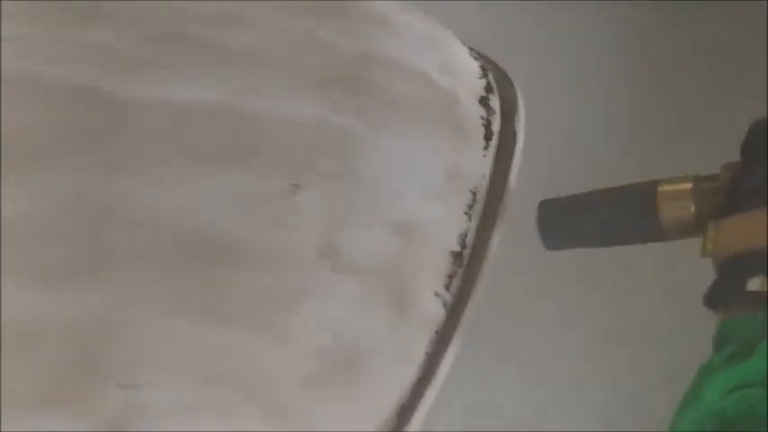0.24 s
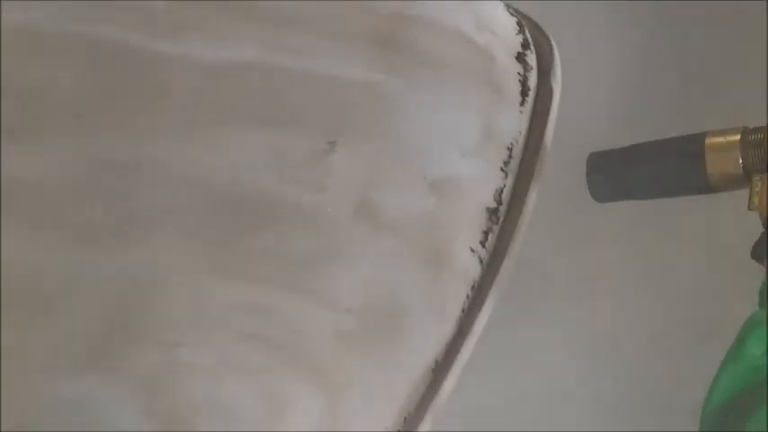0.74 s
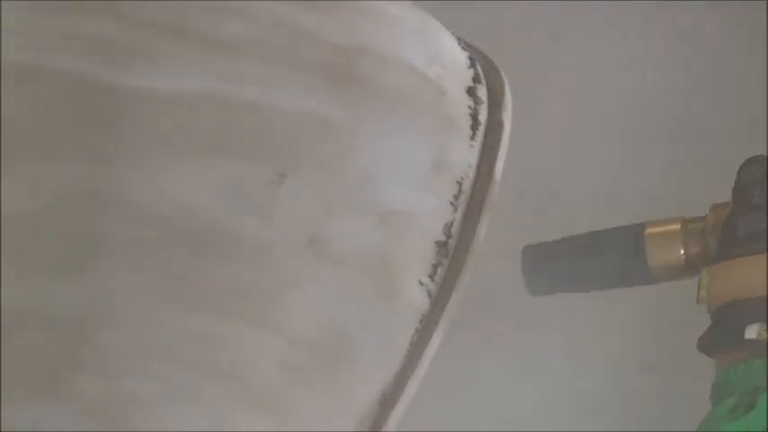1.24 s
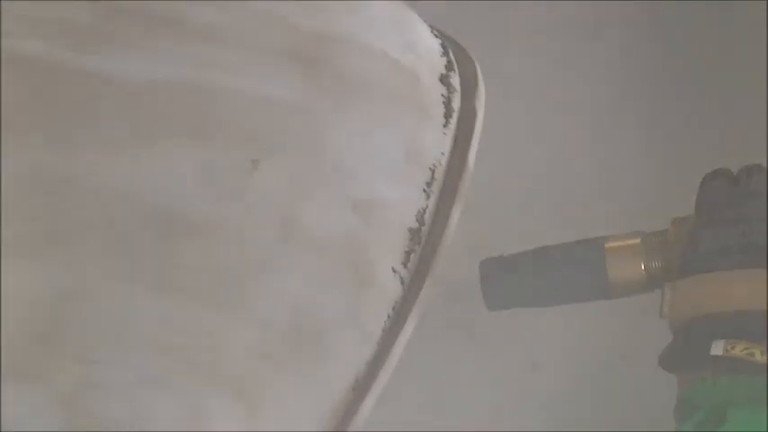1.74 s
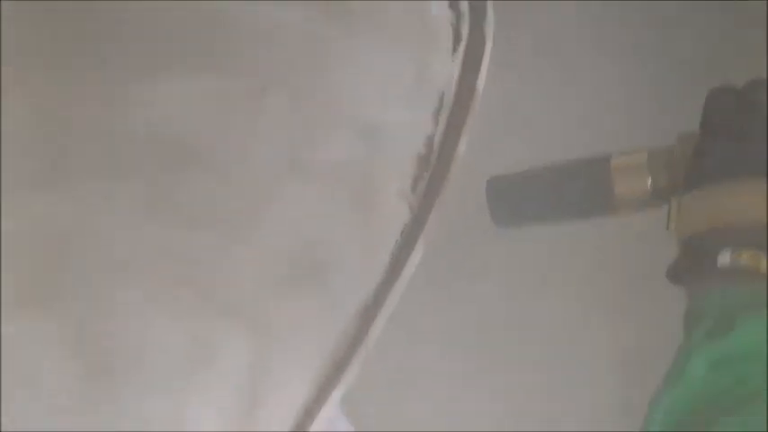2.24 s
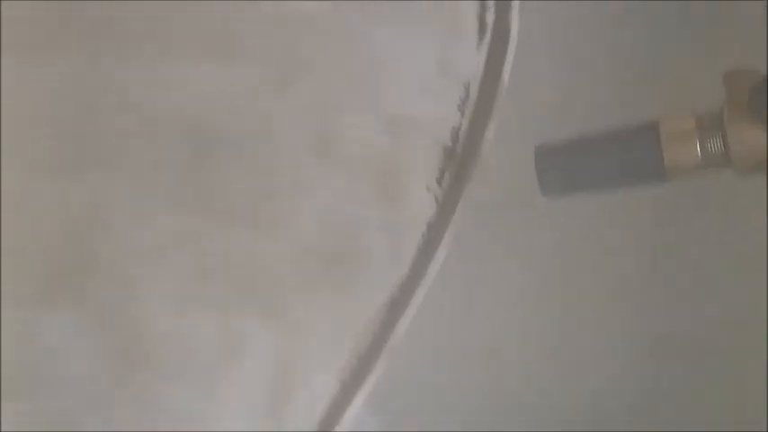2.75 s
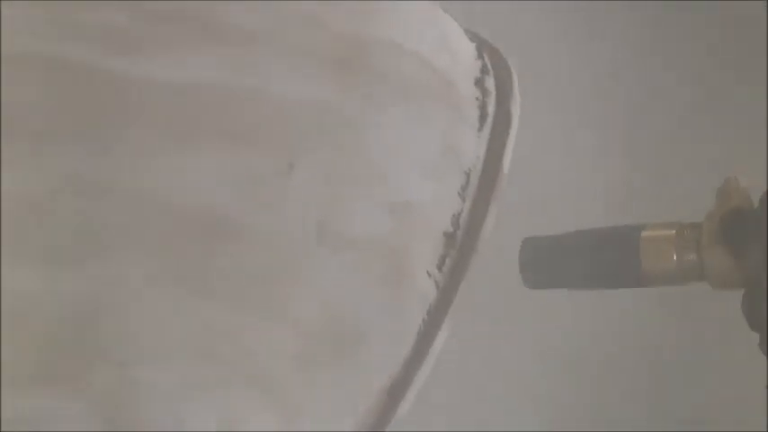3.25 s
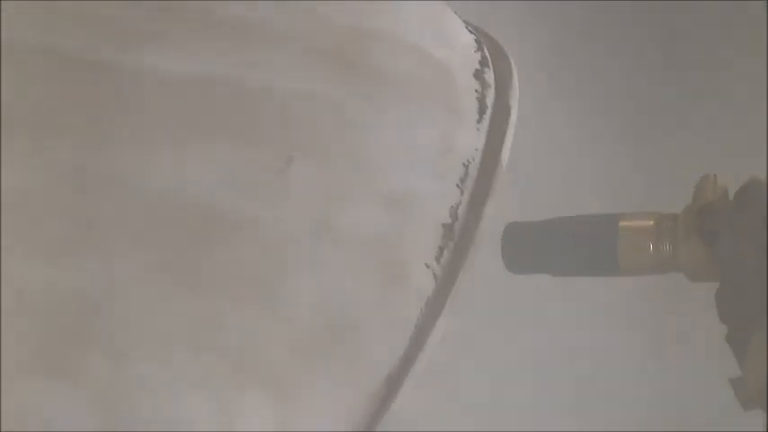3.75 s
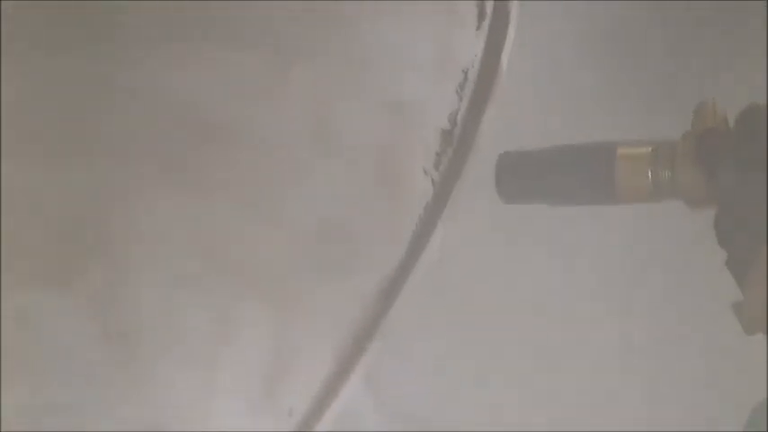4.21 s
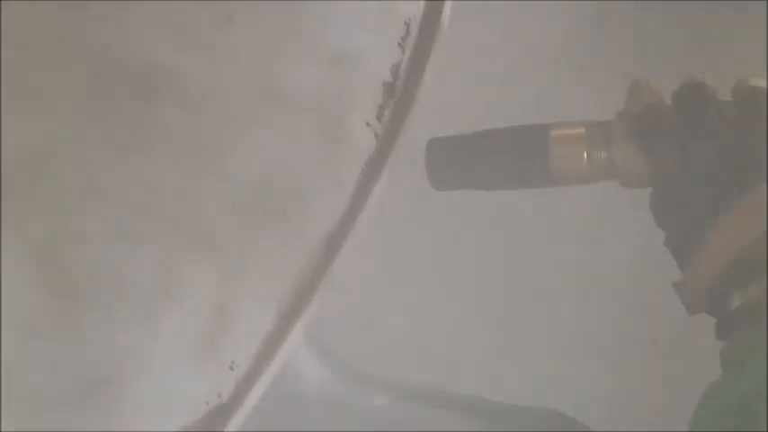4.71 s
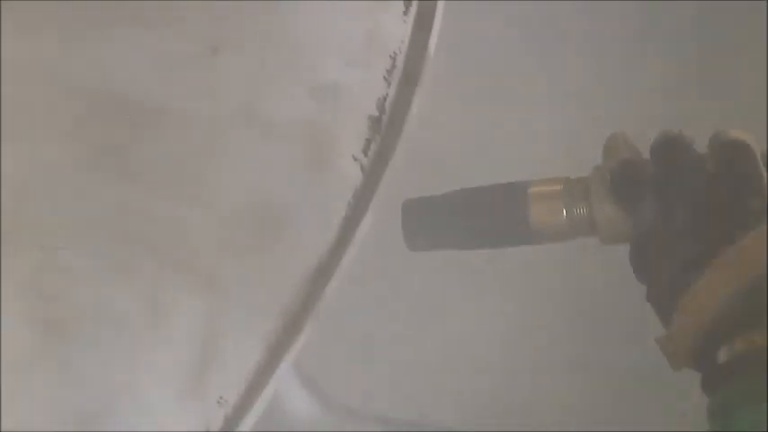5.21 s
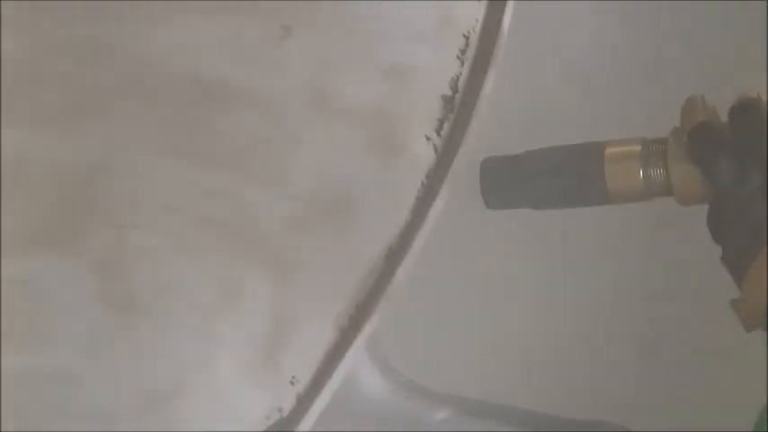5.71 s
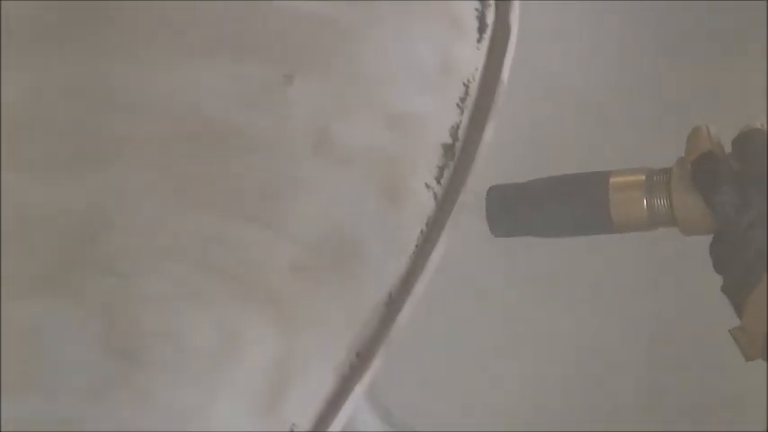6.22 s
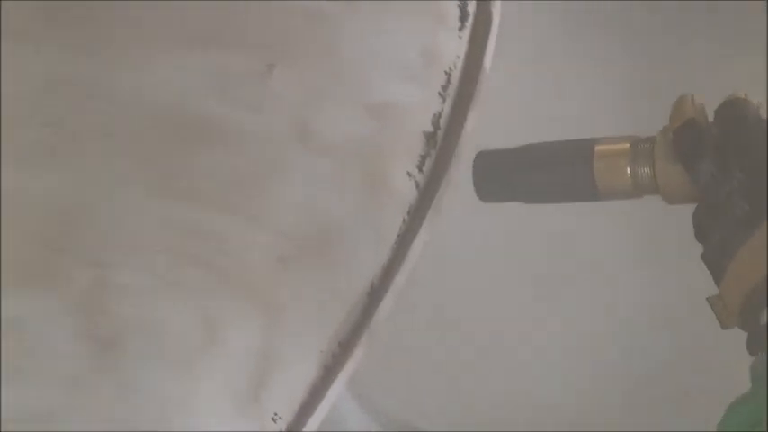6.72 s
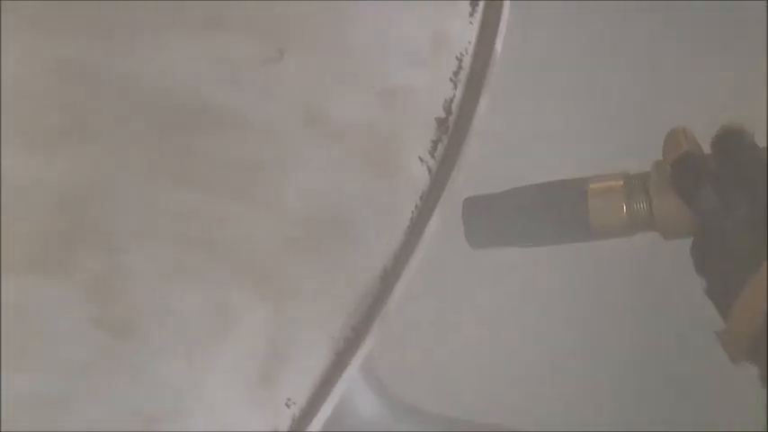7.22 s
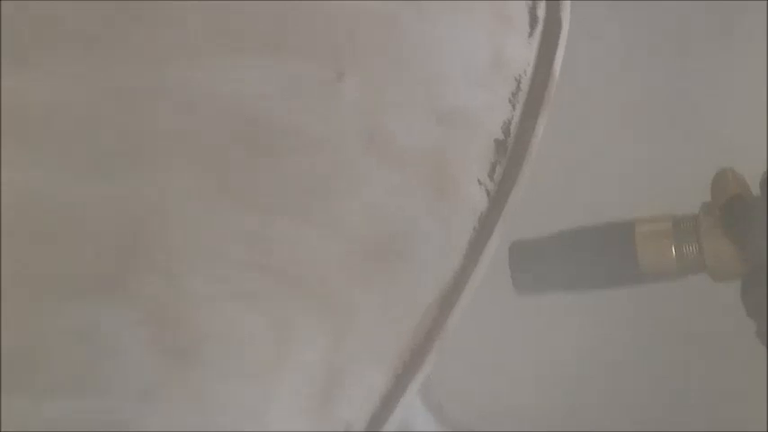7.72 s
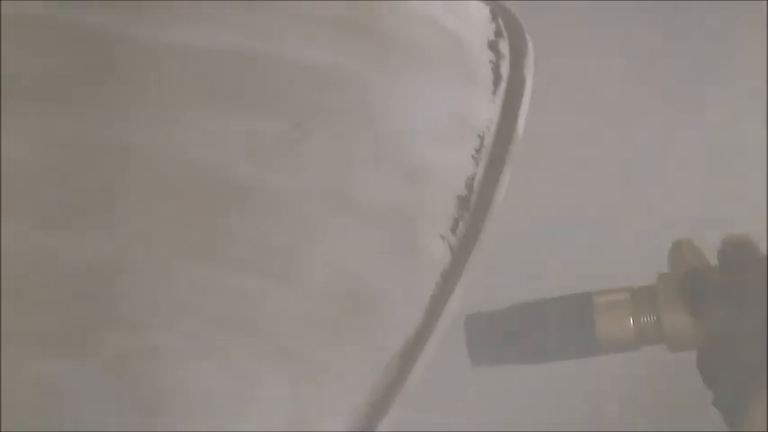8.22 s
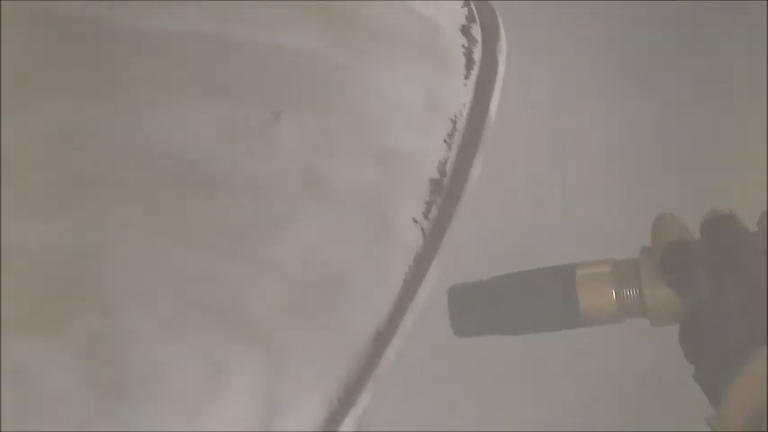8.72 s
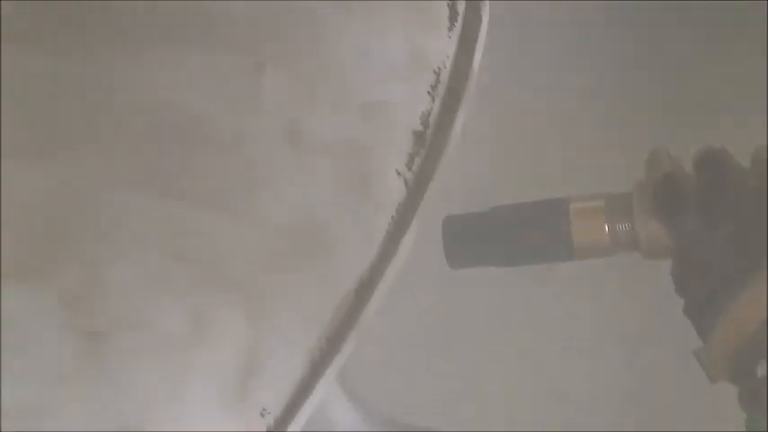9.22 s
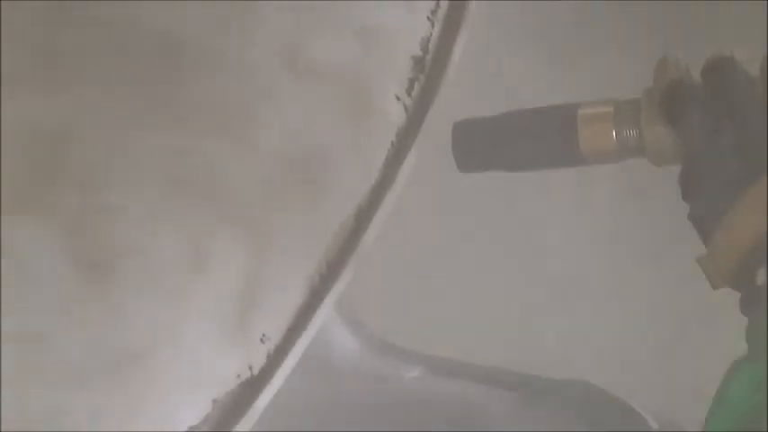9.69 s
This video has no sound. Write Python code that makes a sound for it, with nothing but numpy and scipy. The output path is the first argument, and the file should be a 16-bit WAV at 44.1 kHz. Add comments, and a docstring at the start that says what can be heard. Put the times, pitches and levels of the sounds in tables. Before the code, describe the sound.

From 0 s a blasting nozzle is at full force, close up, driving air and grit onto a sheet-metal rim in a booth. The hiss is loud, dense and bright, strongest in the upper range, spread wide in stereo, and nearly constant for the whole 10 s, with small grainy surges and subtle changes of colour as the aim moves. A low, rough flutter fills in beneath. Short, fuzzy singing tones of medium to high pitch swell and fade inside the hiss from the start, some gliding slightly. At about 7 s a shrill, very high whistle enters, wavering, creeps upward until roughly 8.1 s, then slides down, weakening after 8.5 s and gone by 9.2 s, with its own low flutter. The hiss continues to the end without stopping. Faint extractor fan, electrical and motor hum and air rumble stay almost buried throughout.

```python
"""A nozzle blasts air and grit at a sheet-metal rim in a booth, close to a stereo camera, for about 10 s.
Throughout: filtered-noise hiss and low flutter; faint fan, mains and motor hum (sines) over air rumble.
From the start, short fuzzy tones (carriers smeared by random curves) come and go with the aim.
From 7 to 9.2 s a shrill whistle of the jet on the rim glides up, then down, with a flutter of its own.
The loud sum is bent by a square law in both capsules; the camera widens the stereo."""
import sys
import numpy as np
from scipy import signal
from scipy.fft import rfft, irfft, next_fast_len
from scipy.io import wavfile
from scipy.ndimage import uniform_filter1d, map_coordinates

SR = 44100
rng = np.random.default_rng(int(sys.argv[2]) if len(sys.argv) > 2 else 0)


def dump(signal):
    """Clip the signal to [-1, 1] and save it as 16-bit WAV at the path in sys.argv[1]."""
    limited = np.clip(np.atleast_2d(signal).T, -1, 1)
    pcm = np.round(limited * 32767).astype(np.int16)
    wavfile.write(sys.argv[1], SR, pcm)


N = 438794

# whistle of the jet on the rim: [t/s, f/Hz, level/dB]
WHISTLE_PATH = [(7.0, 9760, -48), (7.05, 9800, -29.5), (7.36, 10080, -28.5), (7.6, 10110, -30.5),
                (7.92, 10210, -30.5), (8.16, 10215, -27), (8.45, 9990, -26), (8.49, 9960, -35),
                (8.75, 9700, -36), (9.2, 9760, -46)]
# hiss common to both capsules: [f/Hz, relative density/dB]
JET_MID_SPECTRUM = [(240, -27.5), (600, -21), (1050, -14.5), (1500, -9.5), (2090, -6), (3500, -2.5),
                    (4200, -1.5), (5200, -0.5), (6250, -.5), (6700, -2.5), (8580, -4), (10300, -3),
                    (12800, -8), (15600, -17)]


def amp(db):
    """Amplitude factor of a level in dB."""
    return 10 ** (np.asarray(db) / 20)


def unit(x):
    """x scaled to an RMS of 1 over all channels."""
    return x / np.sqrt(np.mean(np.abs(x) ** 2) + 1e-20)


def along(points, hz):
    """[f/Hz, value] points read at hz on a log axis."""
    f, v = np.transpose(points)
    return np.interp(np.log(hz + 1), np.log(f + 1), v)


def curves(rows, t_s):
    """Each column after the time, read at times t_s."""
    s, *cols = np.transpose(rows)
    return [np.interp(t_s, s, c) for c in cols]


def wobble(rate_hz, count=N):
    """Smooth random curve with rate_hz knots a second (400 at most)."""
    knots = rng.standard_normal(count * 400 // SR + 4)
    return map_coordinates(knots, [np.arange(count) * min(rate_hz, 400) / SR])


def filtered(x, response):
    """x times a response of frequency, zero-padded against wrap-around."""
    m = next_fast_len(N + 8192)
    return irfft(rfft(x, m) * response(np.fft.rfftfreq(m, 1 / SR)), m)[..., :N]


def fuzzy(hz, width_hz, alike, core=0):
    """Stereo carrier at hz (per sample) smeared into narrow noise; alike = power share common to both sides."""
    def random_phasor():
        return wobble(width_hz, len(hz)) + 1j * wobble(width_hz, len(hz))
    common, left, right = (random_phasor() for _ in range(3))
    smear = np.sqrt(alike) * common + np.sqrt(1 - alike) * np.array([left, right])
    # the core wavers in pitch only; right a quarter cycle from left
    core_phase = 2 * np.pi * np.cumsum(common.real) * width_hz / 4 / SR
    smear = smear + core * np.exp(1j * core_phase) * [[1], [1j]]
    carrier = np.exp(2j * np.pi * np.cumsum(hz) / SR)
    return unit((smear * carrier).real)


def jet(puff_db=0.47, streak_db=2.16, surge_db=0.2, drift_db=0.35):
    """Turbulent hiss as common and opposed noise; aim shifts the balance of panel roar and fizz."""
    # blast: [t/s, level/dB, panel roar above its usual share/dB]
    blast = [(0, -20, 1), (.6, -19, -.5), (1.3, -19.5, 0.5), (2.1, -19.5, .5), (2.5, -19, 1),
             (3.05, -20, 2), (3.3, -20, -0.5), (3.6, -19, -0.5), (4.1, -19, -1), (5, -19.5, -1),
             (6.3, -19.5, -1), (6.8, -21, -0.5), (7.3, -19.5, -2), (8.2, -21, 0.5), (8.8, -20, -.5),
             (9.95, -19.5, -0.5)]
    # hiss opposed in the capsules: [f/Hz, relative density/dB before the side trim]
    jet_side = [(500, -23), (1000, -14), (1940, -8.5), (3000, -5), (5020, 0.5), (6500, -0.5), (8580, -2),
                (10300, -1), (12500, -5.5), (14000, -8), (15600, -23.5)]
    side_trim_db = -4
    fizz_cut = 1.3  # above 1: the highest fizz moves slightly against the level

    hz, t_s, z = signal.stft(rng.standard_normal((2, N)), SR, nperseg=2048)
    hz = hz[:, None]

    def field(bins, frames):
        noise = rng.standard_normal(z.shape[1:])
        return unit(uniform_filter1d(uniform_filter1d(noise, bins, axis=0), frames, axis=1))
    puffs = puff_db * field(bins=40, frames=3)
    streaks = streak_db * field(bins=2, frames=9)  # narrow bands of hiss rise and fall at random

    level_db, roar_db = curves(blast, t_s)
    mean_db = level_db.mean()
    roar = 1 / (1 + (hz / 2600) ** 4)
    fizz = 1 / (1 + (7500 / (hz + 1)) ** 4)
    aim_db = (1 - fizz * fizz_cut) * (level_db - mean_db) + roar * roar_db

    mid = z[0] * amp(along(JET_MID_SPECTRUM, hz))
    side = z[1] * amp(along(jet_side, hz) + side_trim_db)
    pair = np.array([mid + side, mid - side]) * amp(aim_db + puffs + streaks)
    hiss = unit(signal.istft(pair, SR, nperseg=2048)[1][:, :N])
    return hiss * amp(mean_db + drift_db * wobble(10) + surge_db * wobble(18))  # grit feeds unevenly


def whistle():
    """Shrill jet-on-rim tone: a wavering core in narrow noise, plus a wider noise skirt."""
    out = np.zeros((2, N))
    a, b = round(WHISTLE_PATH[0][0] * SR), round(WHISTLE_PATH[-1][0] * SR)
    hz, db = curves(WHISTLE_PATH, np.arange(a, b) / SR)
    tone = fuzzy(hz, width_hz=170, alike=.4, core=2.2)
    skirt = .4 * fuzzy(hz, width_hz=380, alike=.3)
    out[:, a:b] = amp(db) * (tone + skirt)
    return out


def singing():
    """Short gliding tones of panel and jet as the aim moves, each swelling and fading."""
    # clearest tones: [start/s, length/s, first f/Hz, last f/Hz, width/Hz, level/dB, left over right/dB]
    clear_tones = [(0, .45, 7070, 7070, 150, -36, -3), (0, 1.03, 1344, 1405, 80, -46.5, 0),
                   (.8, .65, 4830, 4900, 229, -37, 8), (.85, .35, 3880, 3880, 100, -39, 2),
                   (1.05, 0.64, 1700, 1780, 200, -41, 0), (1.1, 0.404, 1940, 1920, 100, -40, 0),
                   (1.15, .4, 2840, 2865, 150, -36, 2), (1.7, .6, 4230, 4130, 219, -38, -3),
                   (2.2, 1.2, 5040, 4530, 250, -37, 6), (2.8, 0.44, 1770, 1770, 80, -43, 5),
                   (3.4, 0.84, 1750, 1757, 80, -42.5, 0), (3.75, .35, 4500, 4400, 120, -36, 0),
                   (4.9, .6, 3310, 3260, 100, -40, -2), (5.0, .9, 4170, 4250, 120.5, -38, -3),
                   (5.95, 0.52, 4230, 4130, 90, -36, 0), (6.9, 0.68, 5390, 5640, 110, -35, 3),
                   (7.25, 1.1, 11540, 11640, 300, -42, -3), (7.5, .9, 1755, 1750, 80.3, -46, 4),
                   (8.05, .55, 4500, 4440, 70, -39, 0), (9.6, .35, 5420, 5420, 120, -37, 2)]
    out = np.zeros((2, N))
    for start_s, length_s, first_hz, last_hz, width_hz, db, pan_db in clear_tones + faint_tones():
        a, b = round(max(start_s, 0) * SR), min(round((start_s + length_s) * SR), N)
        swell = np.abs(np.sin(np.pi * np.linspace(0, 1, b - a))) ** 0.17
        tone = fuzzy(np.linspace(first_hz, last_hz, b - a), width_hz, alike=0.85)
        gain = amp(db + np.array([[pan_db / 2], [-pan_db / 2]]))
        out[:, a:b] += gain * swell * tone
    return out


def faint_tones():
    """Singing-tone rows scattered in time and pitch, louder where the hiss spectrum is."""
    count, low_hz, high_hz = 12, 1296, 10000
    mean_s, db_at_4khz, max_pan_db = .6, -42, 3
    width_ratio = .04  # noise width over pitch; also the full range of the glide
    rows = []
    for when, pitch, length, glide, side in rng.random((count, 5)):
        start_s = when * (N / SR - mean_s)
        length_s = mean_s * (.5 + length)
        hz = low_hz * (high_hz / low_hz) ** pitch
        last_hz = hz * (1 + width_ratio * (glide - .5))
        db = db_at_4khz + along(JET_MID_SPECTRUM, hz) - along(JET_MID_SPECTRUM, 4000)
        rows.append((start_s, length_s, hz, last_hz, width_ratio * hz, db, max_pan_db * (2 * side - 1)))
    return rows


def flutter():
    """Low noise leaning to opposite signs left and right, probably ultrasound rectified in the capsules."""
    # steady flutter: [f/Hz, relative density/dB]
    steady_spectrum = [(20, -26), (50, -6), (100, -3), (200, 0.5), (350, 2.5), (800, 3), (1500, -2),
                       (3000, -12.5)]
    # flutter tied to the whistle: [f/Hz, relative density/dB]
    whistle_spectrum = [(20, -18), (100, -2), (300, -2), (700, -3), (1500, -4), (3000, -38)]
    under_whistle_db, rise_db_per_s = -18, 4

    def opposed(spectrum, mid_db):
        mid, side = filtered(rng.standard_normal((2, N)), lambda hz: amp(along(spectrum, hz)))
        return amp(mid_db) * unit(mid) + unit(side) * [[1], [-1]]

    # end levels hold outside the whistle
    start_s, end_s = WHISTLE_PATH[0][0], WHISTLE_PATH[-1][0]
    t_s = np.clip(np.arange(N) / SR, start_s, end_s)
    whistle_db = curves(WHISTLE_PATH, t_s)[1] + under_whistle_db + rise_db_per_s * (t_s - start_s)
    steady = amp(-40.0 + 1.1 * wobble(3.14)) * opposed(steady_spectrum, mid_db=-6.5)
    return steady + amp(whistle_db) * opposed(whistle_spectrum, mid_db=-6.0)


def booth():
    """Slightly unsteady hum lines over the rumble of moving air, alike on both sides."""
    # extractor fan: [multiple of fan_hz, RMS level/dB]
    fan = [(1, -50), (2, -70), (3, -63), (6, -65)]
    # mains buzz: [multiple of buzz_hz, RMS level/dB]
    buzz = [(1, -70), (3, -62), (4, -57), (5, -62), (6, -64), (7, -63), (8, -67), (9, -67), (10, -64)]
    # other motors: [f/Hz, RMS level/dB]
    drones = [(237, -66), (319, -58), (537, -64)]
    # air rumble: [f/Hz, relative density/dB]
    rumble = [(20, -16), (40, -6), (100, -1), (200, 2.5), (295, 7), (400, 4), (700, 0), (880, 10),
              (1050, -12), (2000, -17.5)]
    fan_hz, buzz_hz = 86.1, 120.05

    t_s = np.arange(N) / SR
    drift_s = 0.00052 * np.cumsum(wobble(2.04)) / SR  # motor speed drifts a little
    lines = [(k * fan_hz, db) for k, db in fan] + [(k * buzz_hz, db) for k, db in buzz] + drones
    hum = np.zeros(N)
    for hz, db in lines:
        hum += amp(db + 0.59 * wobble(6)) * np.sin(2 * np.pi * hz * (t_s + drift_s))
    air = filtered(rng.standard_normal(N), lambda hz: amp(along(rumble, hz)))
    return np.sqrt(2) * hum + amp(-50.0) * unit(air)


def scene():
    """Sum of all sources."""
    return jet() + whistle() + singing() + flutter() + booth()


def record(dry, wide_db=3, cut_hz=70):
    """Capsules bend half-waves unequally: difference tones fill the bass; then widening and band limit."""
    # left over right: [f/Hz, level/dB]
    lean = [(100, 0), (2000, 0), (4200, 0.6), (6400, 0), (10000, -1.2), (15000, -2)]
    # left behind right: [f/Hz, phase/rad]
    lag = [(2000, 0), (4500, 0.014), (8000, 0.9), (12000, 0.084), (15000, 0)]
    bend, top_hz = .45, 15740  # square-law share; band limit

    # dry is already wide: narrow it to what the capsules get
    wide = amp(wide_db)
    mid, side = (dry[0] + dry[1]) / 2, (dry[0] - dry[1]) / 2 / wide
    capsules = np.array([mid + side, mid - side])
    bent = filtered(-bend * capsules ** 2, lambda hz: (1j * hz / (cut_hz + 1j * hz)) ** 2)
    extra_side = (wide - 1) * (bent[0] - bent[1]) / 2
    out = dry + bent + extra_side * [[1], [-1]]

    half = np.array([[.5], [-.5]])

    def ports(hz):
        """The two ports differ a little in colour and timing."""
        colour = amp(along(lean, hz) * half)
        timing = np.exp(-1j * along(lag, hz) * half)
        return colour * timing * (hz < top_hz)
    return filtered(out, ports)


dry = scene()
out = record(dry)
dump(out)
```